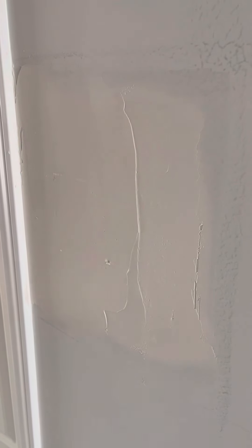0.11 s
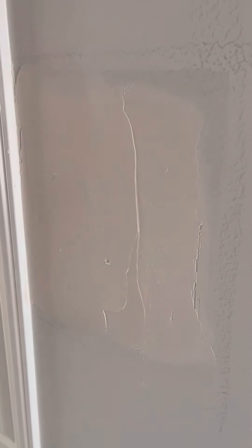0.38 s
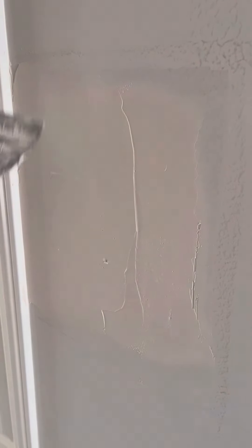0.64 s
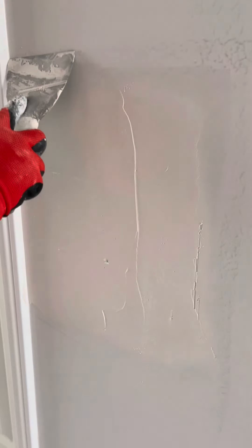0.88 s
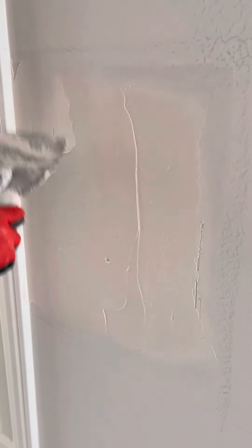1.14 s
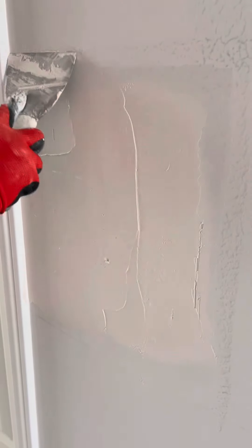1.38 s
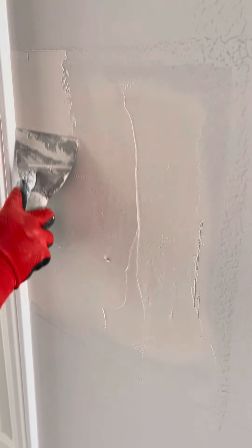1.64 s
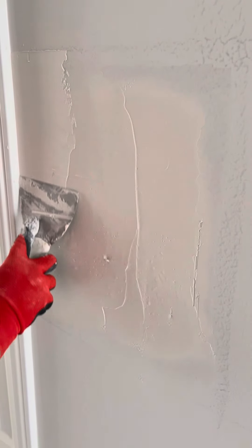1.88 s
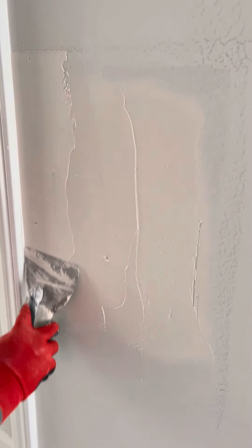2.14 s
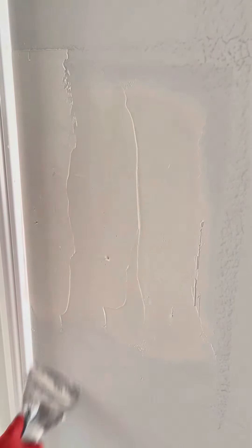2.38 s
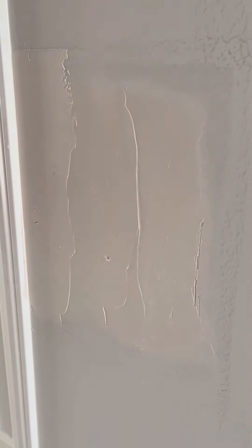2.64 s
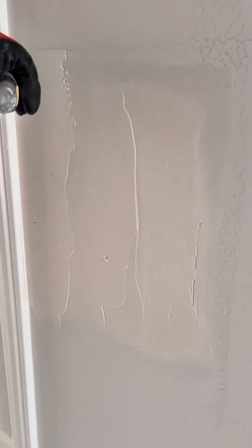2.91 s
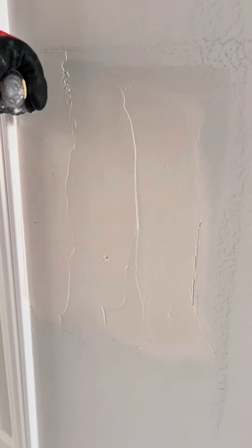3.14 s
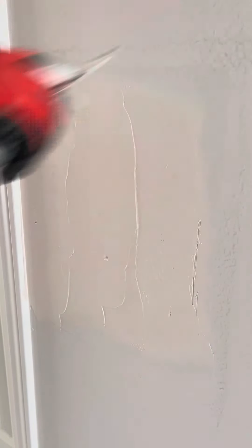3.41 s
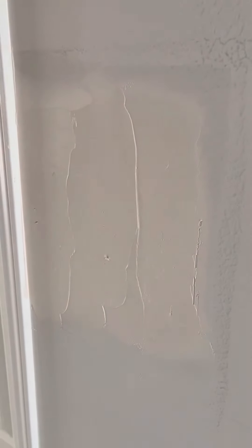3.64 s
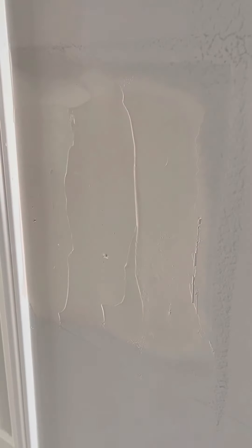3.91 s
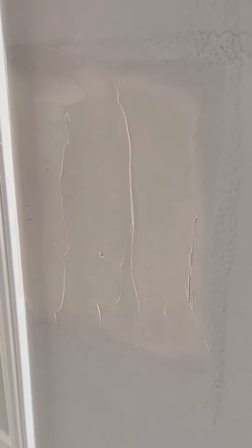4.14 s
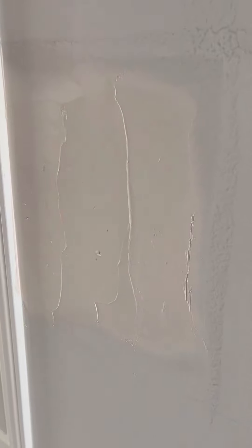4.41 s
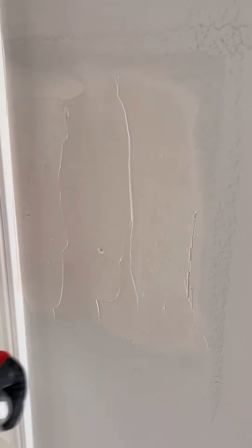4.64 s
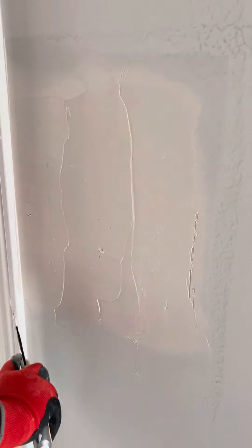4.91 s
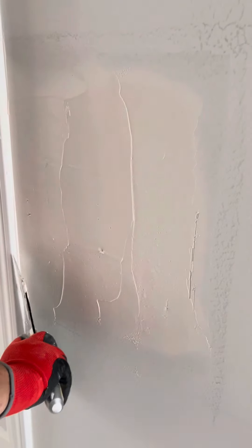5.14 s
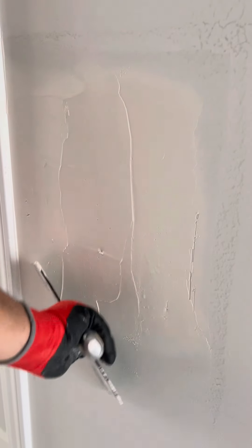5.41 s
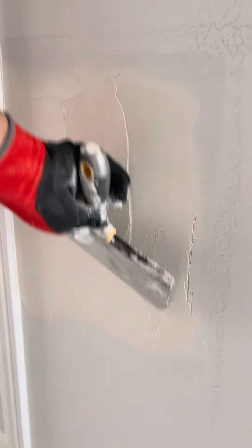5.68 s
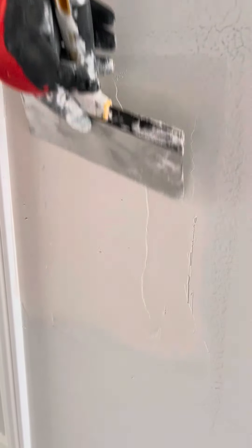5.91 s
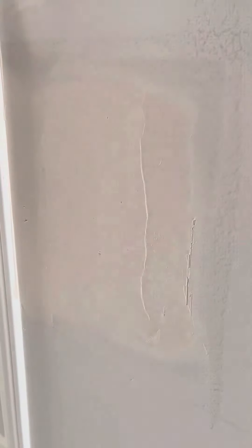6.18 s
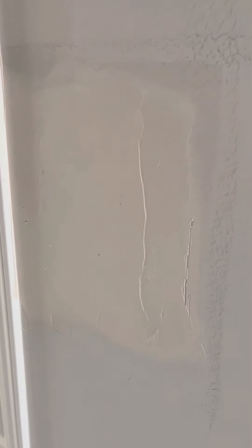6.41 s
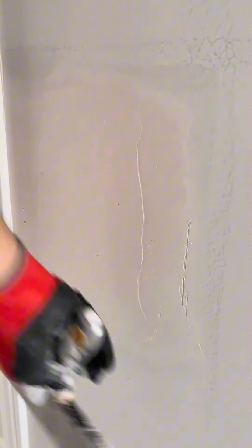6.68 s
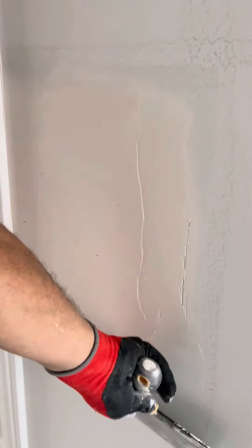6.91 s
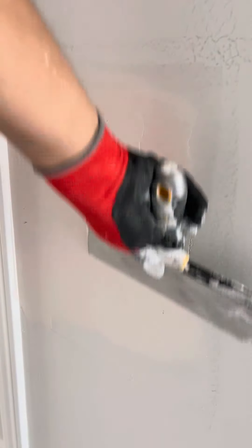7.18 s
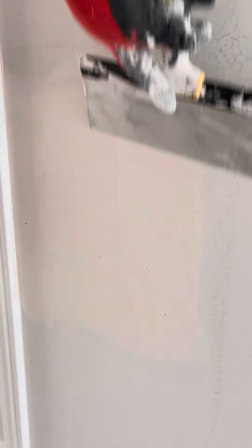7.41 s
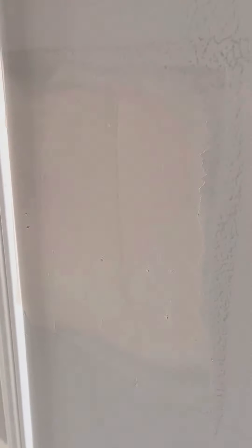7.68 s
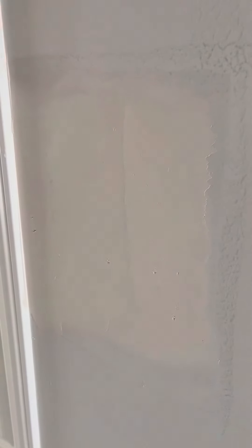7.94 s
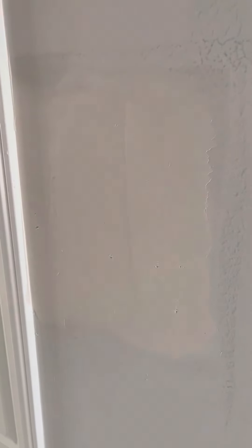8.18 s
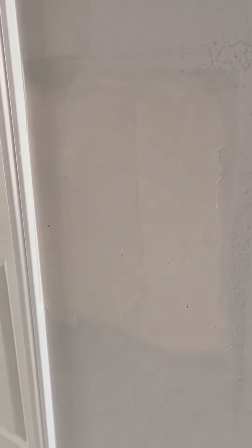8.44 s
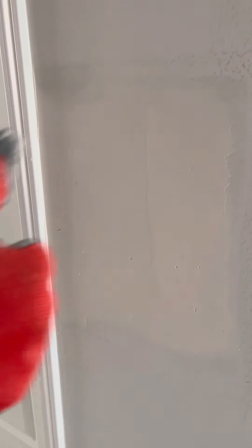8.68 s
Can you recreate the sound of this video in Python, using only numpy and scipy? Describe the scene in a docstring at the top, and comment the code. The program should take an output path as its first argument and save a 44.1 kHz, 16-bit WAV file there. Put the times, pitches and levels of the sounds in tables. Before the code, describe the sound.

A sharp hollow clack with metal ring opens, followed by low thuds and near quiet. Short rasping scrapes and knocks follow, then a cluster of dull taps on wall and metal pan. A longer hissing scrape sings unsteadily, a quick swipe and heavy knock come next, then another long singing stroke. Light knocks end it. Indoors, hard bare room, close stereo pickup with faint drone, rumble and hiss.

```python
"""Filler knife on a plasterboard wall

A steel knife is knocked, wiped and drawn over filler on a plasterboard wall in a bare, echoing room.
Grit (random clicks) excites blade resonances; in two long strokes the bent blade sings in wavering lines.
Knocks are noise bursts through modes of hollow wall, blade and filler pan; soft low thuds, many under the
knocks, ring the floor. A faint far drone, floor rumble, a brief low hum and hiss fill the pauses."""
import sys
import numpy as np
from scipy import signal
from scipy.fft import rfft, irfft
from scipy.io import wavfile
from scipy.ndimage import uniform_filter1d

SR = 44100
rng = np.random.default_rng(int(sys.argv[2]) if len(sys.argv) > 2 else 0)


def transcribe(u):
    """Save the signal u as a 16-bit wav file named by the first command-line argument.

    u: samples, shape (n,) or (channels, n), limited to [-1, 1]; the rate is SR.
    q: integer samples, one column per channel.
    """
    v = np.clip(np.atleast_2d(u).T, -1, 1)
    q = np.round(v * 32767).astype(np.int16)
    wavfile.write(sys.argv[1], SR, q)


def invert_db(level):
    """Linear amplitude ratio for a level in decibels (20 dB per decade), elementwise."""
    return 10 ** (np.asarray(level, dtype=float) / 20)


N = 388521

# edge drawn along, one curve a stroke: time_s, ring_db, hiss_over_ring_db (before flicker and layer trims)
STROKES = [
    [(2.33, -70, 7.5), (2.356, -37.5, 8.5), (2.372, -33.5, 6.5), (2.404, -29.5, -9.5), (2.42, -42.5, 14.5)],
    [(3.235, -48, -7.5), (3.27, -49, 5), (3.3, -49, 12), (3.335, -39.5, 8), (3.365, -33, 9),
     (3.378, -34, 3.5), (3.395, -30.5, 12), (3.408, -40, -5.5), (3.418, -57.5, -4)],
    [(5.18, -66, 15), (5.228, -49, 11), (5.28, -44, 4.5), (5.33, -42, 5.5), (5.375, -40, 4.5),
     (5.406, -36.5, -2), (5.425, -38.5, 1), (5.46, -38, 1), (5.508, -43.5, 5), (5.556, -47, 10),
     (5.62, -77, 10.5)],
    [(6.045, -64.5, 6.5), (6.065, -52, 3), (6.093, -47.5, 6), (6.104, -38.5, 2.5), (6.144, -32, 7),
     (6.17, -47, -10)],
    [(6.93, -71, 8), (6.962, -43, 4.5), (7.0, -37.5, 6.5), (7.03, -33, 4.5), (7.052, -36.5, 6.5),
     (7.086, -37.5, 5), (7.126, -42, 5.5), (7.26, -46.5, 9.5), (7.4, -45, 8.5), (7.5, -42.5, 9),
     (7.57, -32, 7.5), (7.615, -39, 8.5)],
]
# knocks of the knife: peak_s, wall_db, blade_db, tick_db (before trims), wall_centre_hz, blade_centre_hz
KNOCKS = [(0.024, -37.5, -76, -67, 338, 1300), (0.129, -23.5, -54.5, -48, 750, 1310),
          (0.138, -14, -23, -25.5, 783, 1080), (0.142, 2, -24, -29, 683, 1200),
          (0.183, -26.5, -17, -32, 652, 1300), (0.862, -39, -65, -68, 288, 1300),
          (0.976, -54, -62, -42.5, 900, 1518), (2.575, -11.5, -30.5, -35.5, 800, 1500),
          (2.588, -6, -19, -20, 838, 1500), (3.194, -36, -63, -78, 616, 1287),
          (3.246, -23.5, -38.5, -46, 850, 1500), (3.394, -51.5, -45, -25.5, 556, 2400),
          (3.563, -26, -44, -50, 670, 1300), (3.576, -17, -40, -49, 630, 1300),
          (3.633, -18.5, -22.5, -27, 444, 1470), (3.877, -60, -40, -40.5, 546, 2400),
          (4.115, -32, -38.5, -65, 400, 1290), (4.205, -25, -62, -80, 640, 1100),
          (4.215, -22, -50, -78, 700, 1100), (4.224, -24.5, -62, -80, 690, 1100),
          (4.244, -25.5, -45, -78, 700, 1830), (4.347, -32.5, -53, -59, 438, 1500),
          (4.387, -30, -71, -77, 320, 1100), (4.409, -32, -82.5, -80, 320, 1100),
          (4.424, -38, -82.5, -75, 320, 1100), (5.035, -48, -57, -76, 302, 1500),
          (5.711, -60, -85, -58.5, 568, 1500), (6.395, -22.5, -31, -41.5, 608, 1490),
          (6.424, 1.5, -14.5, -25.5, 610, 1430), (6.427, 1, -28, -54, 433, 1500),
          (6.896, -36, -47.5, -61, 346, 1300), (7.937, -11, -50, -24.5, 600, 1860),
          (8.349, -26.5, -35, -47, 505, 2350), (8.408, -19.5, -22.5, -40.5, 445, 1640),
          (8.441, -18, -27, -30.5, 653, 1450), (8.619, -38, -76, -86, 680, 1300)]
# modes of the blade under the hand: mode_hz, width_hz (before widening), level_db
BLADE = [(320, 25, 1.5), (700, 43, -7.5), (850, 220, -3), (1087, 100, -1.5), (1315, 54, -0.5),
         (1563, 75, -2.5), (1835, 67, -3.5), (2094, 90, 1.5), (2400, 210, -6.5), (3000, 290, -4.5),
         (3350, 420, -9.5)]
# modes of the hollow board: mode_hz, width_hz (before widening), level_db
WALL = [(320, 110, -2.5), (426, 27, 0.5), (511, 33, -2.5), (608, 53, 0), (688, 53, 1.5), (752.4, 50, 2),
        (880, 120, -3)]
# modes of floor and joists: mode_hz, width_hz (before widening), level_db
FLOOR = [(62, 75, -8), (124, 16, 3.5), (155, 28, -1.5), (207, 55, -5), (280, 16, -8.5)]


def rms_one(x):
    """Scale to unit rms."""
    return x / np.sqrt(np.mean(x ** 2) + 1e-20)


def at_hz(points, hz):
    """Read a table on a log-frequency axis."""
    points = np.array(points)
    return np.interp(np.log(hz), np.log(points[:, 0]), points[:, 1])


def gain_in_time(rows, column=1):
    """Join the dB values of a curve into a gain per sample."""
    rows = np.array(rows)
    return invert_db(np.interp(np.arange(N) / SR, rows[:, 0], rows[:, column]))


def during(tables, column, outside, edge_s):
    """One value per sample from several short curves; between them it rests at the outside value."""
    rows = []
    for table in tables:
        rows.append((table[0][0] - edge_s, outside))
        rows += [(row[0], row[column]) for row in table]
        rows.append((table[-1][0] + edge_s, outside))
    return np.interp(np.arange(N) / SR, *np.transpose(sorted(rows)))


def drift(per_s):
    """Slow random wander of spread about 1, per_s (1 to 59) new values a second."""
    knots = rng.standard_normal(int(N / SR * 60) + 2)
    place = np.arange(N) / SR * np.clip(per_s, 1, 59)
    return 1.22 * np.interp(place, np.arange(len(knots)), knots)   # restores spread lost between knots


def filtered(x, order, hz, kind="low"):
    """Butterworth filter."""
    return signal.sosfilt(signal.butter(order, hz, kind, fs=SR, output="sos"), x)


def coloured(x, spectrum):
    """Shape a steady signal by a spectrum; rms 1."""
    hz = np.maximum(np.arange(N // 2 + 1) * SR / N, 1)
    return rms_one(irfft(rfft(x) * invert_db(at_hz(spectrum, hz)), N))


def resonate(x, modes, widen=0.83, spread=None):
    """Parallel resonances of alternating sign, each with its own drive strength if given."""
    out = 0
    for k, (hz, width_hz, level_db) in enumerate(modes):
        radius = np.exp(-np.pi * widen * width_hz / SR)
        drive = x if spread is None else x * spread[k]
        zeros = [1 - radius, 0, radius - 1]
        poles = [1, -2 * radius * np.cos(2 * np.pi * hz / SR), radius * radius]
        out = out + (-1) ** k * invert_db(level_db) * signal.lfilter(zeros, poles, drive + 1e-18)
    return out


def wavering_tone(rows, column, width_hz):
    """A narrow band of noise around a moving centre; rms 1."""
    rows = np.array(rows)
    phase = 2 * np.pi * np.cumsum(np.interp(np.arange(N) / SR, rows[:, 0], rows[:, column])) / SR
    slow = filtered(rng.standard_normal((2, N)), 2, width_hz / 2)
    return rms_one(slow[0] * np.cos(phase) + slow[1] * np.sin(phase))


def struck(table, column, contact_s, soft_hz, modes, trim_db, widen, centre=None, focus_db=0):
    """Each blow is a short uneven contact of even spectrum up to its softness; modes near its centre answer most."""
    table, length = np.array(table), int(8 * contact_s * SR)
    t = np.arange(length) / (contact_s * SR)
    spectra = rfft(rng.standard_normal((len(table), length)) * t * np.exp(-t), 4 * length)
    bursts = irfft(spectra / np.abs(spectra), 4 * length)[:, :length] * np.minimum(t, 1)
    chance_db = 2.0 * rng.standard_normal((len(table), len(modes)))
    out = np.zeros(N)
    for row, burst, mode_db in zip(table, bursts, chance_db):
        start = int((row[0] - contact_s) * SR)      # the contact builds up before its peak
        if centre:
            octaves_off = np.abs(np.log2(np.array(modes)[:, 0] / row[centre]))
            mode_db = mode_db - focus_db * octaves_off
        push = filtered(np.pad(burst, (0, SR // 2)), 2, min(soft_hz, .4 * SR))
        hit = resonate(push, modes, widen, invert_db(mode_db))[:N - start]
        hit = hit / np.sqrt(np.mean(hit[:SR // 50] ** 2))      # level is that of the first 20 ms
        out[start:start + len(hit)] += invert_db(row[column] + trim_db) * hit
    return out


def stroke_db():
    """Pressure along every stroke; it dies quickly when the edge lifts off."""
    return during(STROKES, column=1, outside=-110, edge_s=.01)


def microphone_hiss():
    """Steady noise below 11 kHz, independent left and right."""
    return invert_db(-76) * filtered(rng.standard_normal((2, N)), 4, 11000)


def far_drone(near):
    """Shaped noise from far off; it also swells after near sounds, as their late echo."""
    # level of the drone: time_s, level_db
    drone_level = [(0, -65), (2.2, -61.5), (4.3, -64), (4.86, -72), (6.0, -74), (7.7, -75.5), (8.81, -68.5)]
    # spectrum of the drone: freq_hz, density_db
    drone_spectrum = [(150, -49.5), (250, -15.5), (395, -18), (439, -12.5), (592, -4.5), (673, -6),
                      (836, -18.5), (1000, -37.5), (1500, -44), (1950, -34.5), (3300, -120)]
    echo_db, echo_s = -29, 0.035
    t = np.arange(SR) / (echo_s * SR)
    smear = t ** 2 * np.exp(-t) / (echo_s * SR)
    late = np.sqrt(np.abs(signal.fftconvolve(near ** 2, smear)[:N]))
    noise = 0.07 * rng.standard_normal(N) + rng.standard_normal((2, N))
    return (gain_in_time(drone_level) + invert_db(echo_db) * late) * coloured(noise, drone_spectrum)


def low_hum():
    """A low sine hums briefly, its pitch gliding."""
    # the hum: time_s, level_db (rms), pitch_hz
    hum_curve = [(4.4, -84, 149), (4.5, -61, 151.6), (4.68, -57, 148), (4.74, -73.5, 150),
                 (5.0, -77, 148.5), (5.05, -100, 149.5)]
    level_db = during([hum_curve], column=1, outside=-120, edge_s=.01)
    pitch_hz = during([hum_curve], column=2, outside=190, edge_s=0.013)
    return invert_db(level_db) * np.sqrt(2) * np.sin(2 * np.pi * np.cumsum(pitch_hz) / SR)


def floor_rumble():
    """Wavering low band plus noise in the floor modes, swelling unevenly and under the strokes."""
    # low rumble: time_s, level_db (before drift), centre_hz of the wavering band
    rumble_curve = [(0, -55.5, 150.7), (0.3, -65, 125), (0.76, -76.5, 128.4), (1.0, -63, 160),
                    (1.4, -84, 140), (1.75, -74.5, 117.6), (2.06, -66, 125.4), (2.3, -74, 130),
                    (3.1, -77.5, 143.5), (3.45, -54, 140.1), (3.56, -80, 150.6), (3.72, -56, 129.6),
                    (3.8, -56.5, 135), (4.05, -72, 151.8), (4.3, -55, 144.3), (4.45, -65, 150),
                    (5.0, -85.5, 149.9), (5.1, -64, 169.1), (5.4, -65, 170), (5.85, -74.5, 143.5),
                    (6.3, -83, 150), (6.7, -66.5, 146), (7.3, -85, 160), (7.62, -54.5, 155),
                    (7.85, -73.5, 151.3), (8.12, -65.5, 143.5), (8.49, -60.5, 169.5), (8.81, -70, 144)]
    apart_db, under_stroke_db = -11, -23   # part opposite in left and right; rumble below stroke pressure
    noise = rng.standard_normal(N) + invert_db(apart_db) * rng.standard_normal(N) * [[1], [-1]]
    floor = wavering_tone(rumble_curve, column=2, width_hz=61) + invert_db(-3.0) * rms_one(resonate(noise, FLOOR))
    level = gain_in_time(rumble_curve) * invert_db(2.8 * drift(9.2)) + invert_db(under_stroke_db + stroke_db())
    return level * rms_one(floor)


def floor_thuds():
    """Soft low thuds, many under the knocks, ring the modes of the floor."""
    # thuds: peak_s, level_db (before trim), centre_hz
    thud_table = [(0.028, -42, 266), (0.133, -35, 291), (0.199, -31, 200), (0.36, -30.5, 222),
                  (0.38, -13, 124), (0.419, -39, 124), (0.525, -38, 70), (0.502, -35, 160),
                  (0.857, -40.5, 280), (0.88, -36.5, 202), (0.908, -43, 200), (1.385, -45.5, 126.8),
                  (1.853, -60, 115.6), (2.388, -37.5, 207), (2.586, -32, 235), (3.199, -32.5, 172),
                  (3.232, -29.5, 202), (3.249, -20.5, 218), (3.404, -32.5, 177), (3.563, -36, 299),
                  (3.637, -32, 231), (4.212, -37.5, 188), (4.29, -44.5, 155), (4.33, -44, 299),
                  (4.41, -43, 275), (5.035, -44.5, 280), (5.099, -47, 172), (6.125, -32, 310),
                  (6.424, -28.5, 247), (6.894, -32, 176), (7.936, -27.5, 191), (8.348, -38.5, 242),
                  (8.409, -32, 236), (8.439, -29, 288), (8.628, -42.5, 129)]
    return struck(thud_table, 1, 0.0028, 330, FLOOR, -10.0, 1.3, centre=2, focus_db=21.5)


def pan_ring():
    """Blows leave the steel filler pan in the other hand ringing; narrow modes die slowly."""
    # modes of the pan: mode_hz, level_db, t60_s (before widening)
    pan_modes = [(322, -5.5, 0.2), (430, -3, 0.23), (463, -4, 0.31), (492, -7.5, 0.34), (594, -5.5, 0.3),
                 (611, -4.5, .35), (669, -8, .5), (693, -4, 0.3), (858, -1, 0.33), (916, -6, 0.44),
                 (1136, -16, 0.27), (1335, -3, .22), (1460, -17.5, 0.27), (1650, -17.5, .2),
                 (1900, -21.5, .25), (2050, -19.5, .27)]
    # blows that set it ringing: peak_s, level_db, centre_hz
    pan_blows = [(0.144, -38, 700), (0.184, -42, 1335), (2.588, -27, 830), (3.576, -37.5, 670),
                 (3.636, -42, 700), (4.116, -42, 1335), (4.218, -42.5, 700), (4.244, -48.5, 700),
                 (4.31, -58, 690), (4.39, -48.5, 322), (4.41, -47.5, 322), (5.036, -59.5, 322),
                 (6.395, -47.5, 608), (6.424, -22, 551), (7.94, -38.5, 755), (8.351, -46, 450),
                 (8.41, -37, 400), (8.443, -42, 400)]
    modes = []
    for hz, level_db, t60_s in pan_modes:
        width_hz = np.log(1000) / (np.pi * t60_s)
        modes.append((hz, width_hz, level_db - 20 * np.log10(width_hz)))
    return struck(pan_blows, 1, 0.00092, 2200, modes, 0, 0.77, centre=2, focus_db=9.0)


def wall_knocks():
    """Each knock rings the hollow board in a few broad modes."""
    return struck(KNOCKS, 1, .0012, 1200, WALL, -16.0, 1.5, centre=4, focus_db=29.5)


def knock_ticks():
    """Bright tick of each knock: a burst through very broad treble resonances."""
    tick_modes = [(4600, 7900, -2.0), (6730, 7500, 1.5), (9830, 2300, -1.5)]   # mode_hz, width_hz, level_db
    return struck(KNOCKS, 3, 0.0016, 16000, tick_modes, -4.0, 1.6)


def blade_clacks():
    """Clack of the damped blade at each knock: its upper modes, much widened."""
    return struck(KNOCKS, 2, 0.0011, 5000, BLADE[3:], -8.5, 3.9, centre=5, focus_db=11.)


def grains(per_s, uneven_db):
    """Random clicks of exponential size in dB: grit catching under the edge."""
    sizes = invert_db(uneven_db * np.minimum(rng.exponential(1, N), 4)) * rng.choice([-1, 1], N)
    return sizes * (rng.random(N) < per_s / SR)


def scuff_gain(column):
    """The edge lands or slips; every scuff rises and falls at the same rates."""
    # scuffs: peak_s, ring_db, hiss_db, drumming_db (before layer trims)
    scuffs = [(0.029, -47.5, -69, -37.5), (0.139, -29, -31.5, -27.5), (0.184, -35, -37, -25.5),
              (0.372, -45, -71.5, -37.5), (0.866, -53, -45.5, -45), (1.388, -65.5, -63, -58),
              (1.846, -66, -75, -60), (1.968, -65.5, -68.5, -63.5), (1.988, -60.5, -71, -65),
              (2.574, -36.5, -32.5, -39), (2.588, -21, -20, -12), (3.573, -21, -12.5, -15),
              (3.636, -25, -33, -51.5), (3.883, -40.5, -43, -47), (4.12, -54, -52, -44),
              (4.218, -65, -82, -32.5), (4.398, -75, -48, -47), (4.607, -56.5, -70.5, -77.5),
              (5.034, -54, -59, -65), (5.714, -66.5, -35, -64.5), (6.103, -48, -42.5, -48),
              (6.396, -38, -53, -33), (6.429, -25, -28.5, -10.5), (6.892, -54.5, -64, -39.5),
              (6.916, -69, -74, -42.5), (7.761, -50.5, -39, -53), (7.93, -39, -25.5, -36),
              (7.941, -22.5, -16.5, -18), (8.348, -40, -55, -31.5), (8.407, -28, -53, -25.5),
              (8.448, -37, -56, -22.5)]
    rise_db_per_s, fall_db_per_s = 1403.5, 894.5
    out, t = np.zeros(N + SR), np.arange(-SR // 20, SR // 10) / SR
    shape = invert_db(np.where(t < 0, rise_db_per_s * t, -fall_db_per_s * t))
    for row in scuffs:
        start = int(row[0] * SR)
        out[start:start + len(t)] += invert_db(row[column]) * shape
    return out[SR // 20:SR // 20 + N]


def contact():
    """How hard blade, grit and board are driven by strokes, by scuffs and by the spells between them."""
    # rubbing, scraping, rattling and drumming between strokes and after knocks, one curve a spell:
    # time_s, hiss_db, drumming_db (before flicker and layer trims)
    between_spells = [
        [(0.0, -53.5, -41), (0.11, -54.5, -59), (0.22, -52, -42.5), (0.3, -48.5, -42.5), (0.46, -53, -55.5),
         (0.62, -61, -75)],
        [(0.9, -54, -52), (0.92, -48, -55), (0.98, -46, -49.5), (1.03, -49, -61), (1.055, -66, -64.5),
         (1.11, -53, -68), (1.15, -67.5, -74)],
        [(1.4, -67, -71.5), (1.45, -65, -72), (1.75, -68, -73.5), (2.3, -67, -72)],
        [(3.64, -46, -35.5), (3.76, -40, -37.5), (3.95, -60, -56), (4.18, -62, -70), (4.3, -57.5, -42),
         (4.46, -59.5, -62), (4.7, -61.5, -64)],
        [(4.92, -71.5, -80), (4.95, -66.5, -78), (5.02, -71, -76), (5.05, -68, -65), (5.12, -67.5, -68),
         (5.17, -53, -63)],
        [(5.76, -76, -79), (5.9, -68.5, -78), (6.03, -67, -73)],
        [(6.45, -42, -57), (6.5, -29.5, -57), (6.54, -40, -56), (6.6, -50, -58), (6.68, -62, -69.5)],
        [(7.97, -39, -47), (8.08, -41, -39), (8.18, -48, -46.5), (8.24, -48, -80)],
        [(8.38, -60, -56), (8.42, -47, -35), (8.47, -52, -40), (8.53, -61, -47), (8.62, -73, -54)],
    ]
    pressure = invert_db(stroke_db() + 1.34 * drift(30.))
    hiss_over_ring = invert_db(during(STROKES, column=2, outside=0, edge_s=.01))
    board_under_stroke = invert_db(-8.5 + 3.5 * drift(22.))   # drums below the ring, unevenly
    between_db = during(between_spells, column=1, outside=-110, edge_s=.03)
    firm = np.clip((between_db + 70.5) / 12.0, 0, 1)   # the faintest is even
    between = invert_db(between_db + firm * 2.5 * drift(20.0))
    drumming_db = during(between_spells, column=2, outside=-110, edge_s=.03)
    drumming = invert_db(drumming_db + 4 * drift(25.))
    ring = pressure + scuff_gain(column=1) + invert_db(-6) * between
    hiss = pressure * hiss_over_ring + scuff_gain(column=2) + between
    board = pressure * board_under_stroke + scuff_gain(column=3) + drumming
    return ring, hiss, board


def bent_singing(singing_strokes, bent):
    """Three wavering lines of the bent blade, catching unevenly."""
    lines = [row for stroke in singing_strokes for row in stroke]
    upper = gain_in_time(lines, column=3) * wavering_tone(lines, column=1, width_hz=130)
    lower = gain_in_time(lines, column=4) * wavering_tone(lines, column=2, width_hz=150)
    third = gain_in_time(lines, column=6) * wavering_tone(lines, column=5, width_hz=350)
    return bent * invert_db(1 * drift(45.)) * (upper + lower + third)


def scraping():
    """Grit rings the blade, hisses off its edge and drums the board; a bent blade rings more; apart, its singing."""
    # spectrum of the grit: freq_hz, density_db
    grit_spectrum = [(350, -37), (600, -15.5), (716, -8.5), (1470, -6.5), (4810, -10.5), (5820, -9.5),
                     (8990, -3.5), (11000, -6), (15500, -34.5)]
    # lines of the bent blade in two long strokes, levels before flicker and trim:
    # time_s, upper_hz, lower_hz, upper_db, lower_db, third_hz, third_db
    singing_strokes = [
        [(5.2, 2250, 1328, -6, 2, 3116, -3), (5.3, 2272, 1365, -3, 3, 3447, -7),
         (5.36, 2267, 1382, -7, 0, 3300, -6), (5.42, 2173, 1555, -2.5, -3.5, 3620, -9),
         (5.48, 2210, 1492, -3, -9, 3500, -10), (5.53, 2190, 1333, -6, -6.5, 3350, -14),
         (5.6, 2200, 1264, -7, -11, 3303, -6)],
        [(6.96, 2196, 1274, -4, -3, 1810, -5), (7.0, 2133, 1045, -1, 3.5, 1750, -10.5),
         (7.04, 2126, 888, 5.5, -4.5, 1650, -1.5), (7.08, 2161, 755.6, 5, -2.5, 1480, -2),
         (7.12, 2150, 727.5, -7, 1, 1340, -3), (7.27, 2400, 700, 0.5, -11, 1348, -13),
         (7.36, 2333, 709.4, 0, -3, 1350, -24), (7.45, 2358, 700, 1, -2, 1334, -19.5),
         (7.53, 2260, 700, -3.5, 3, 1341, -13.5), (7.6, 2128, 684, -15.5, -24.5, 1340, -18.5)],
    ]
    straight_ring_db, bent_ring_db, bent_scrape_db = -16, 3.5, -2   # the plain scrape recedes when bent
    spells = [[(row[0], 1) for row in stroke] for stroke in singing_strokes]
    bent = during(spells, column=1, outside=0, edge_s=0.028)
    # a wide edge: each port hears grit of its own over a shared part
    rough = .5 * grains(1800, 1.8) + np.array([grains(2500, 3.8), grains(2500, 2.8)])
    scrape = rms_one(filtered(coloured(rough, grit_spectrum), 2, [800, 4200], "band"))
    ring_db = straight_ring_db + (bent_ring_db - straight_ring_db) * bent
    blade = invert_db(bent_scrape_db * bent) * scrape + invert_db(ring_db) * rms_one(resonate(rough, BLADE))
    hiss = rms_one(filtered(coloured(grains(9000, 2.6), grit_spectrum), 2, 4200, "high"))
    board = rms_one(resonate(grains(1500, 3.0), WALL, widen=1.3))
    ring_gain, hiss_gain, board_gain = contact()
    strokes = invert_db(-1.5) * ring_gain * blade + invert_db(-8.0) * hiss_gain * hiss + invert_db(-7.0) * board_gain * board
    return strokes, invert_db(-3) * ring_gain * bent_singing(singing_strokes, bent)


def spacious(length, weigh):
    """Half-octave bands of stereo noise, alike left and right as far as the likeness says."""
    # left-right likeness: freq_hz, correlation (-1 to 1, clipped to 0.95)
    likeness = [(60, 0.92), (150, 1), (380, -0.1), (950, -0.42), (2380, 0.13), (5980, -0.11), (9000, -0.16),
                (15000, 0.48)]
    out, edges_hz = 0, 40 * 2 ** np.arange(0, 9, .5)
    white = rng.standard_normal((2, 2, length))
    for k, (low, high) in enumerate(zip(edges_hz, edges_hz[1:])):
        mid, side = filtered(white[k % 2], 2, [low, high], "band")
        hz = np.sqrt(low * high)
        alike = np.clip(at_hz(likeness, hz), -.95, .95)
        out = out + weigh(hz) * (np.sqrt(1 + alike) * mid + np.sqrt(1 - alike) * side * [[1], [-1]])
    return out


def room(x):
    """Dense echoes that build in a few ms and die band by band."""
    # reverberation time: freq_hz, t60_s
    room_t60 = [(100, 0.6), (260, 0.28), (700, 0.89), (1840, 0.62), (4850, 0.52), (10000, 0.32)]
    # echo against direct sound, before the sends in scene(): freq_hz, level_db
    room_level = [(100, -3.5), (300, -0.5), (700, -4.5), (2000, -5), (5000, -3), (11000, -4.5)]
    t = np.arange(int(.9 * SR)) / SR

    def dying(hz):
        t60_s = at_hz(room_t60, hz)
        return invert_db(at_hz(room_level, hz) - 60 * t / t60_s) * np.sqrt(7 / (t60_s * SR))

    echoes = spacious(len(t), dying) * (1 - np.exp(-t / 0.003))
    return signal.fftconvolve(x[None], echoes, axes=1)[:, :N]


def at_ports(x, lag):
    """A source off to the left reaches the right port later, by lag samples."""
    turn = np.exp(-2j * np.pi * np.arange(N // 2 + 1) * lag / N)
    return np.array([x[0], irfft(rfft(x[1]) * turn, N)])


def leaning_left(db):
    """Left and right gains, the left db louder."""
    return invert_db([[db / 2], [-db / 2]])


def scene():
    """Knocks, strokes and thuds, their echo and the background."""
    blows, ticks, clacks = wall_knocks() + pan_ring(), knock_ticks(), blade_clacks()
    strokes, singing = scraping()
    strokes_mono = strokes.mean(axis=0)
    thuds = floor_thuds()
    sides = leaning_left(3)
    near = at_ports(blows * leaning_left(4), 15)
    near = near + at_ports(ticks * sides + strokes, 7.27)
    near = near + at_ports((clacks + singing) * sides, 0.77)
    # board, pan and floor echo least; ticks and clacks, close by, less than the strokes
    sent = invert_db(-11) * blows + invert_db(-1.5) * (ticks + clacks) + strokes_mono + singing + invert_db(-8) * thuds
    background = floor_rumble() + low_hum() + far_drone(blows + strokes_mono) + microphone_hiss()
    return near + thuds + room(sent) + background


def roll_off(x):
    """The treble ends steeply here."""
    return signal.sosfilt(signal.butter(12, 15950, fs=SR, output="sos"), x)


def record(dry):
    """Microphone colour; a noise suppressor turns the treble down when it grows faint; peaks are rounded."""
    # microphone response: freq_hz, gain_db
    microphone = [(40, 1), (100, -1.5), (8500, 1), (9200, 1.5), (10500, 5), (11500, -2.5), (13000, -11.5),
                  (15500, -20), (16200, -59.5)]
    hz = np.maximum(np.arange(N // 2 + 1) * SR / N, 1)
    x = irfft(rfft(dry) * invert_db(at_hz(microphone, hz)), N)
    treble = signal.sosfiltfilt(signal.butter(2, 1100, "high", fs=SR, output="sos"), x)
    power = uniform_filter1d(np.mean(treble ** 2, axis=0), size=1300)
    level_db = 10 * np.log10(power + 1e-12)
    treble_gain_db = np.clip(0.19 * (level_db + 61.5), -14, 0)
    x = x + treble * (invert_db(treble_gain_db) - 1)
    x = .9 * np.tanh(x / .9)
    return roll_off(x)


dry = scene()
out = record(dry)
transcribe(out)
```